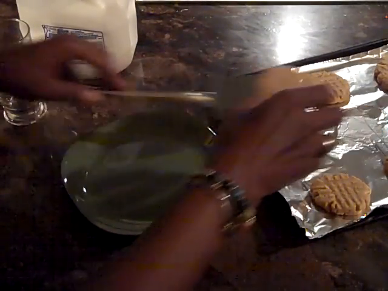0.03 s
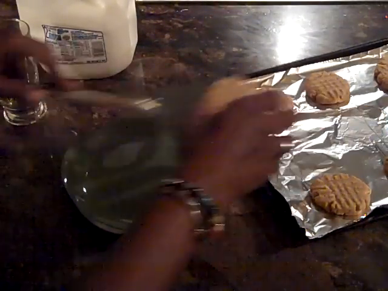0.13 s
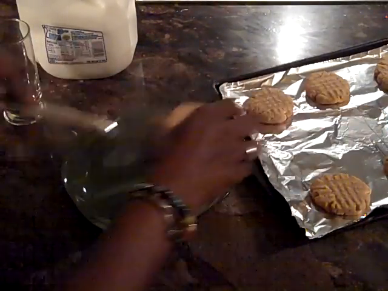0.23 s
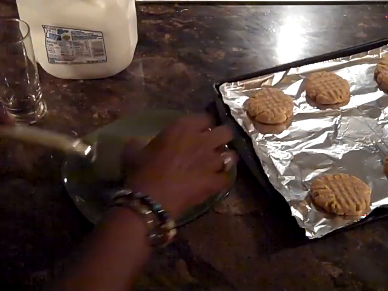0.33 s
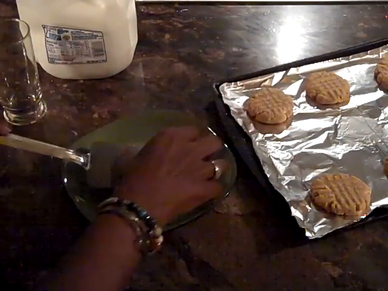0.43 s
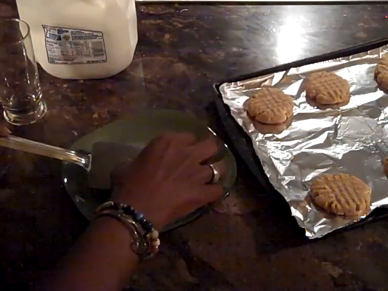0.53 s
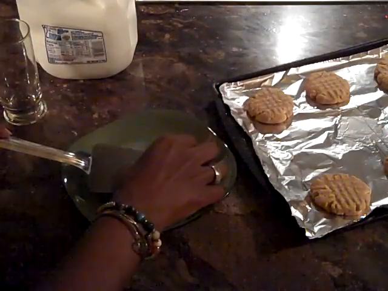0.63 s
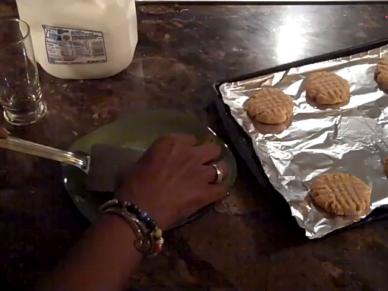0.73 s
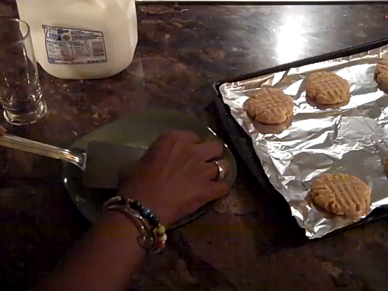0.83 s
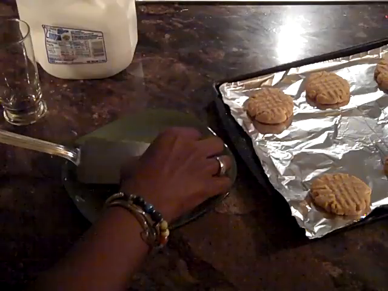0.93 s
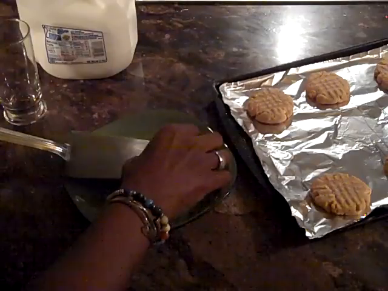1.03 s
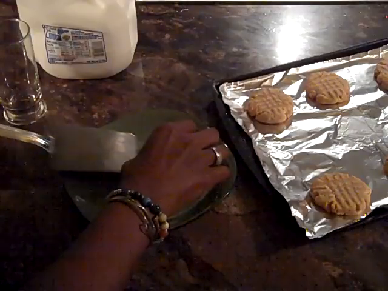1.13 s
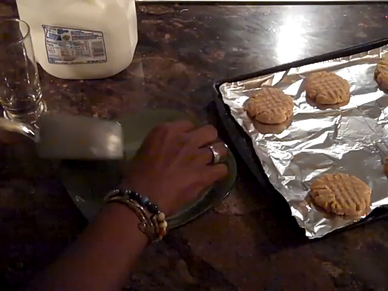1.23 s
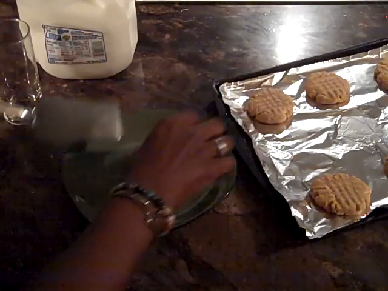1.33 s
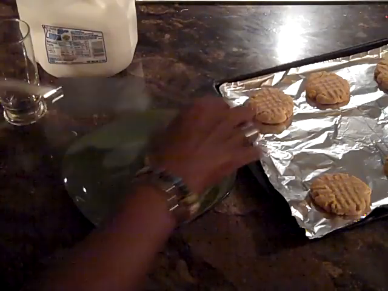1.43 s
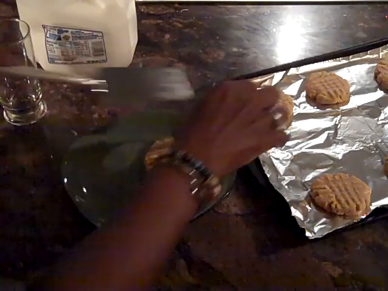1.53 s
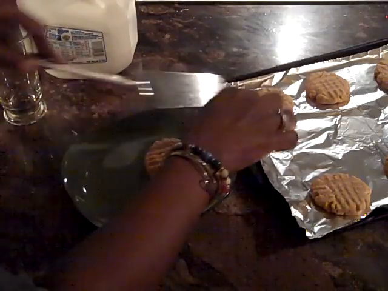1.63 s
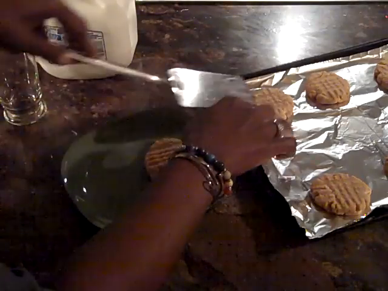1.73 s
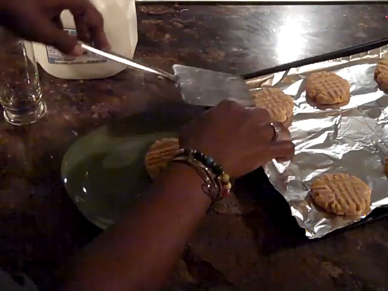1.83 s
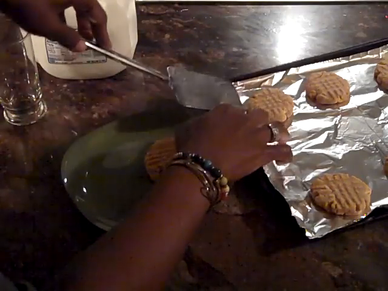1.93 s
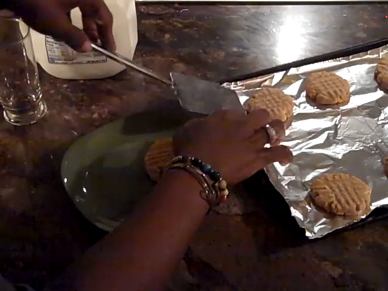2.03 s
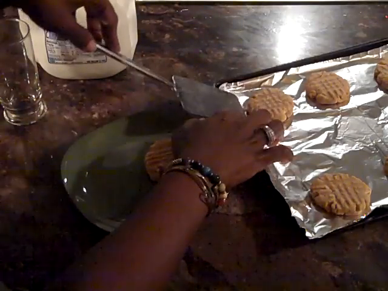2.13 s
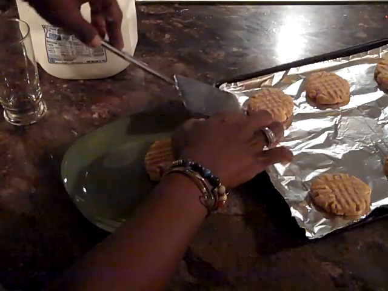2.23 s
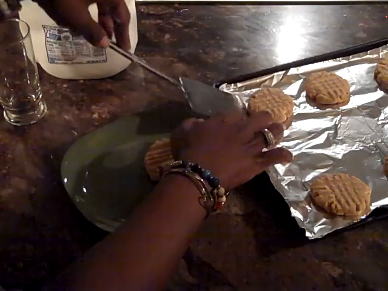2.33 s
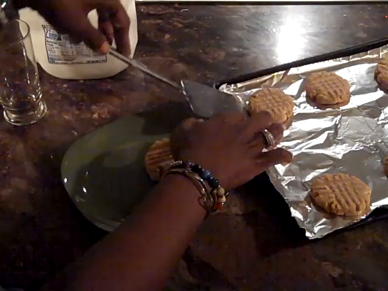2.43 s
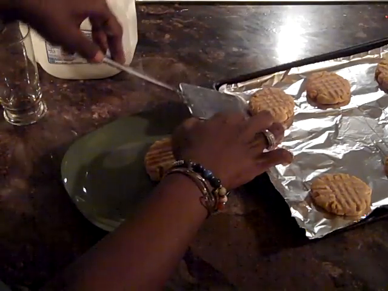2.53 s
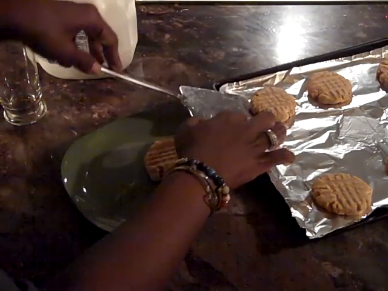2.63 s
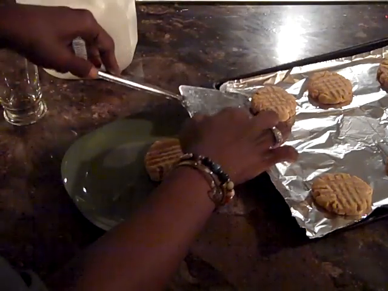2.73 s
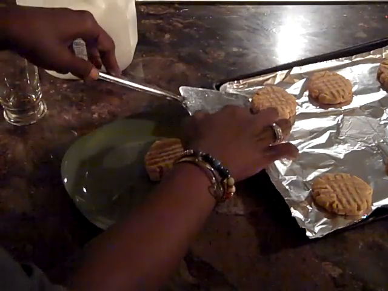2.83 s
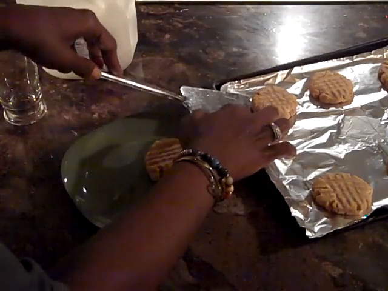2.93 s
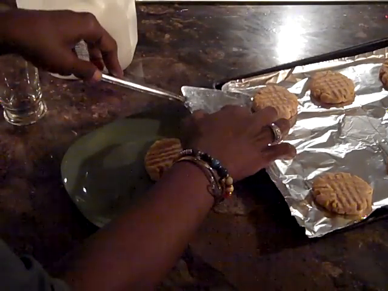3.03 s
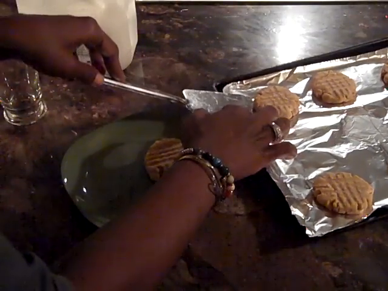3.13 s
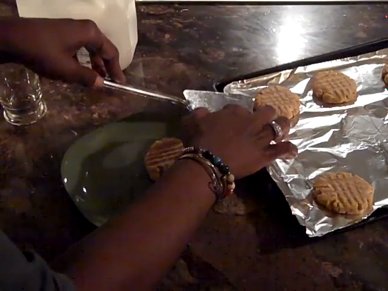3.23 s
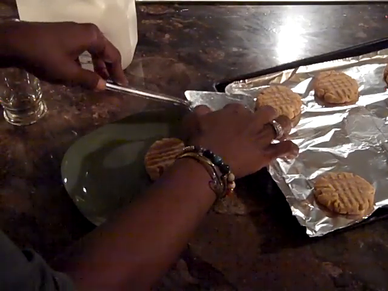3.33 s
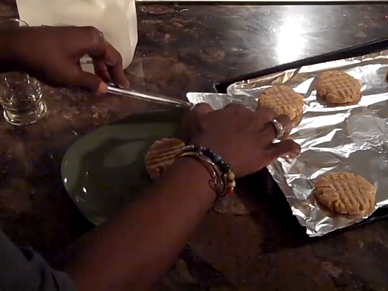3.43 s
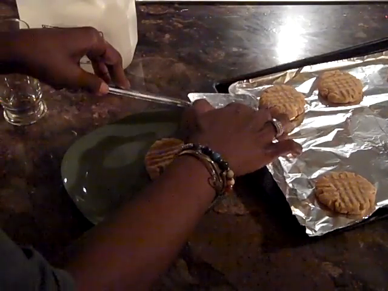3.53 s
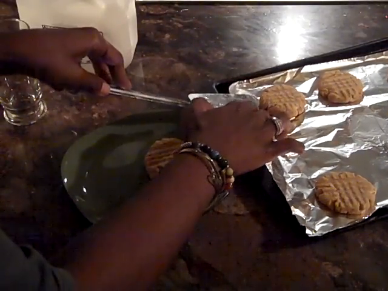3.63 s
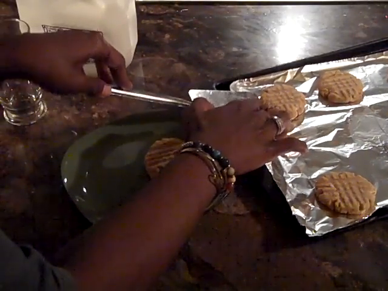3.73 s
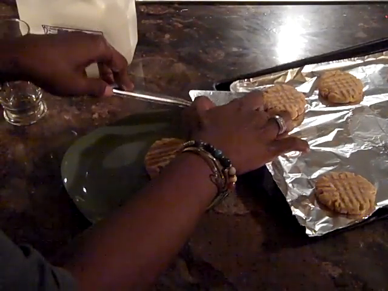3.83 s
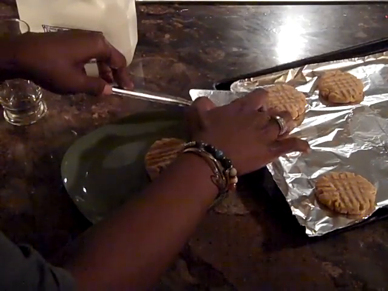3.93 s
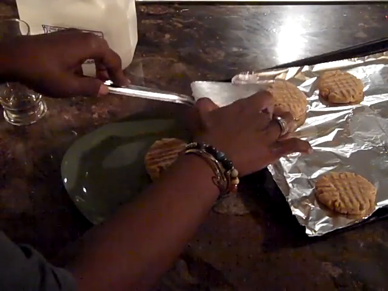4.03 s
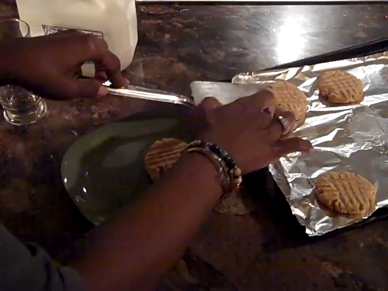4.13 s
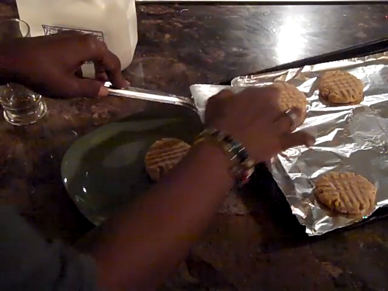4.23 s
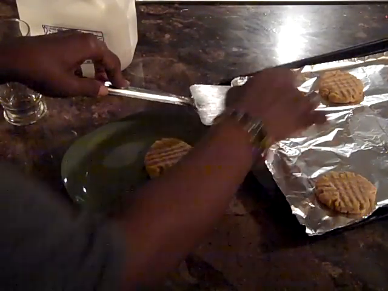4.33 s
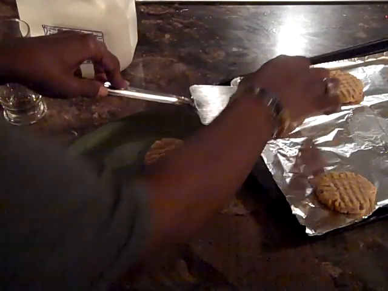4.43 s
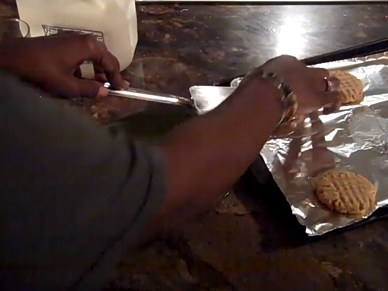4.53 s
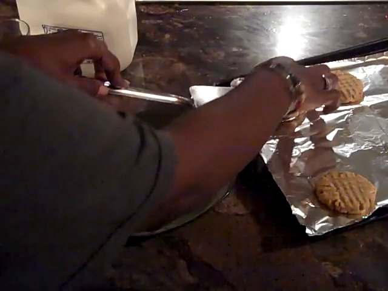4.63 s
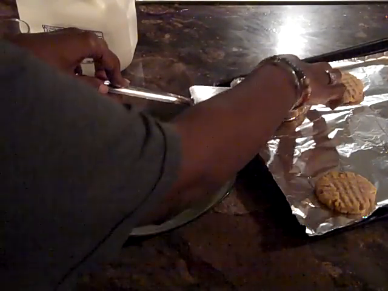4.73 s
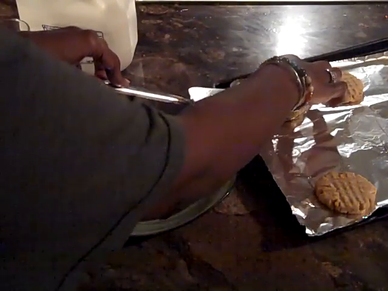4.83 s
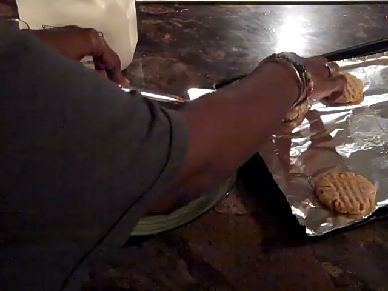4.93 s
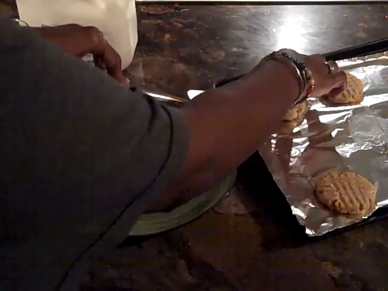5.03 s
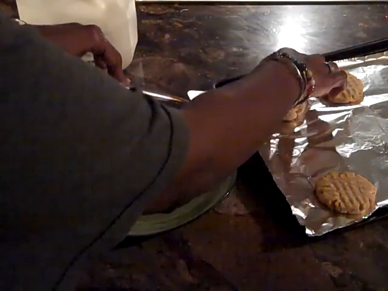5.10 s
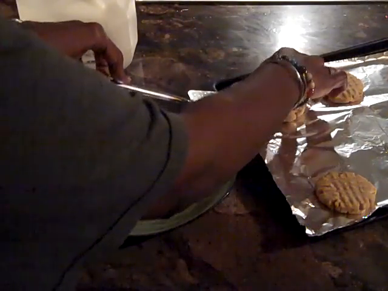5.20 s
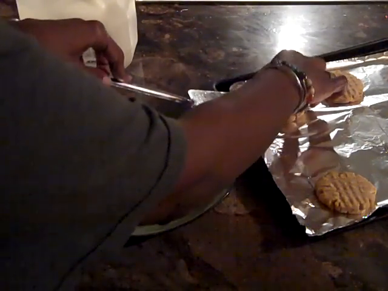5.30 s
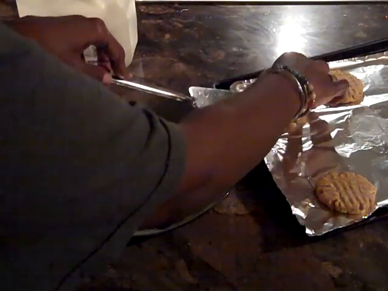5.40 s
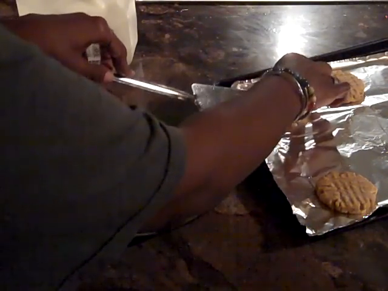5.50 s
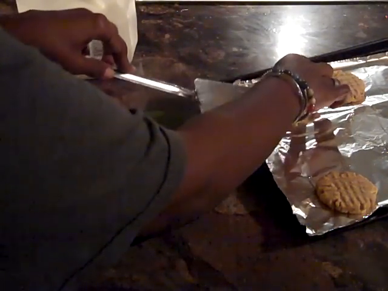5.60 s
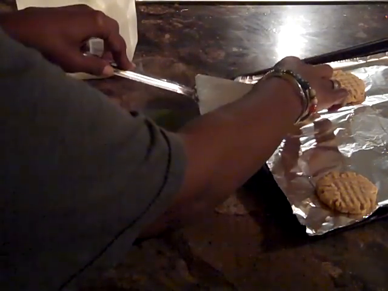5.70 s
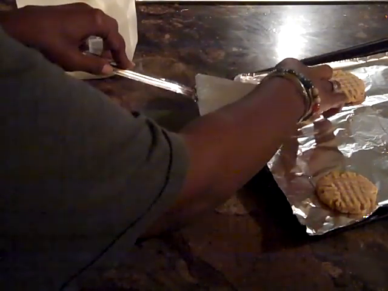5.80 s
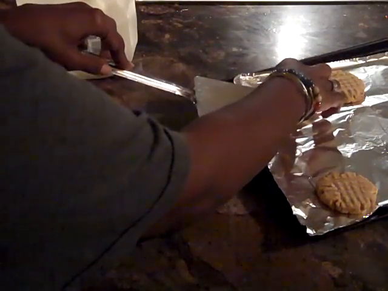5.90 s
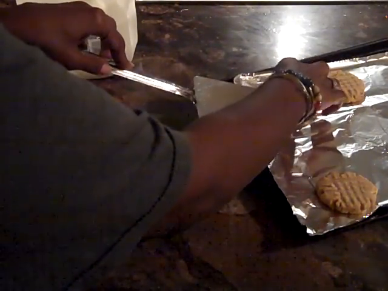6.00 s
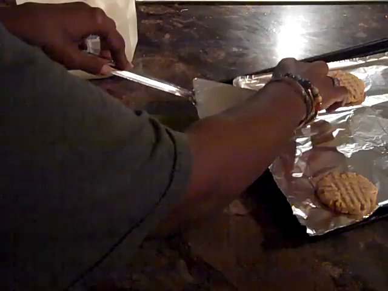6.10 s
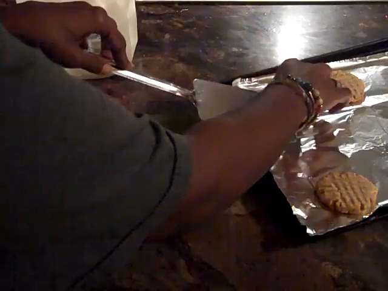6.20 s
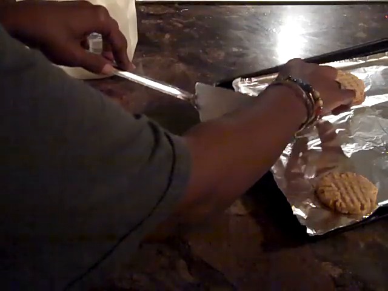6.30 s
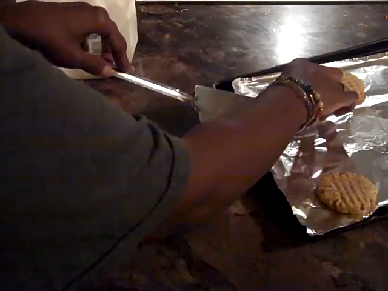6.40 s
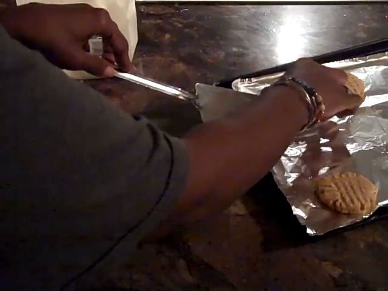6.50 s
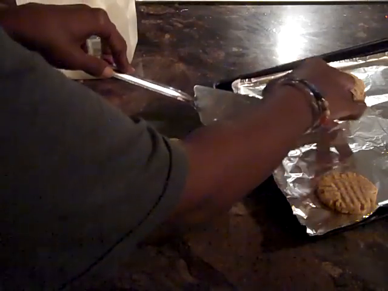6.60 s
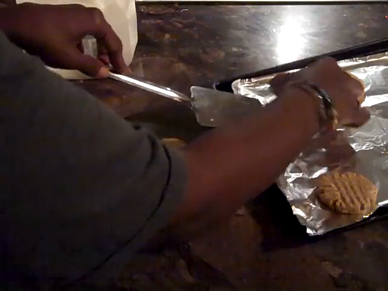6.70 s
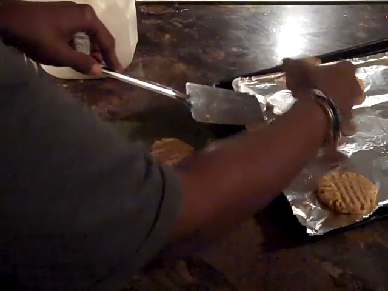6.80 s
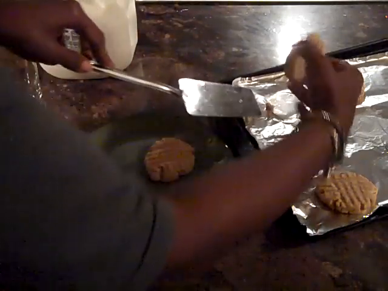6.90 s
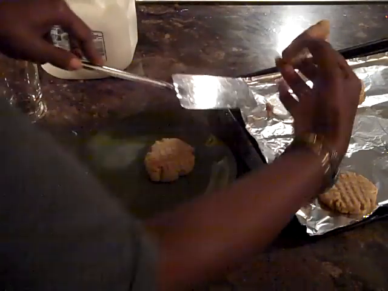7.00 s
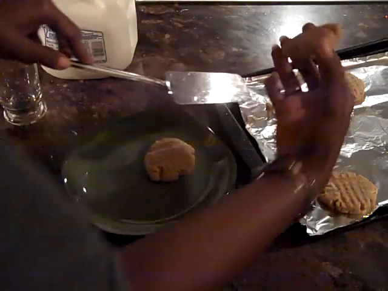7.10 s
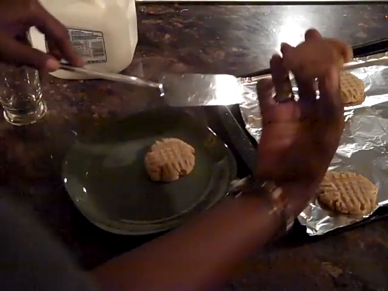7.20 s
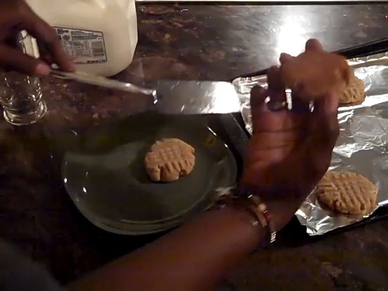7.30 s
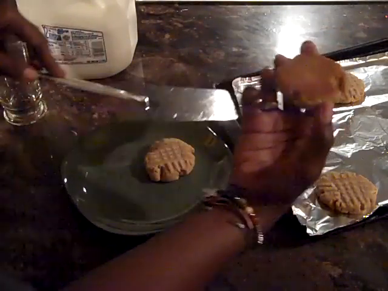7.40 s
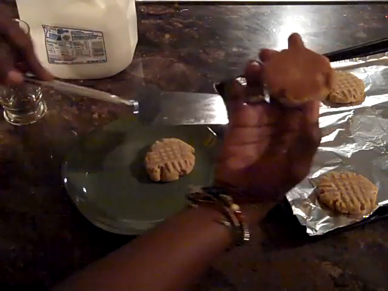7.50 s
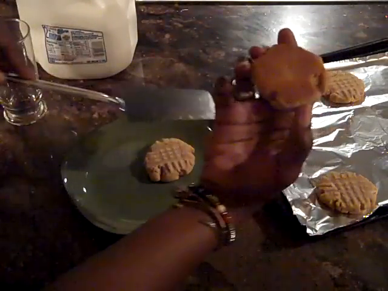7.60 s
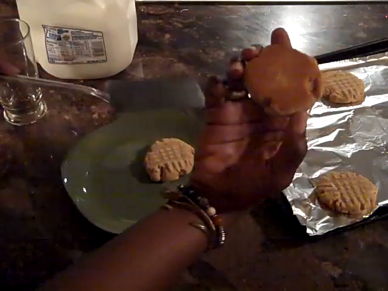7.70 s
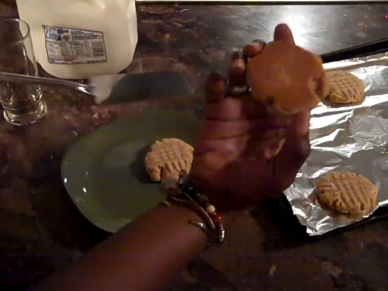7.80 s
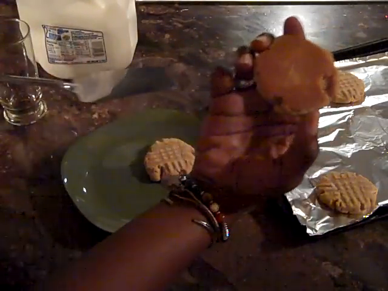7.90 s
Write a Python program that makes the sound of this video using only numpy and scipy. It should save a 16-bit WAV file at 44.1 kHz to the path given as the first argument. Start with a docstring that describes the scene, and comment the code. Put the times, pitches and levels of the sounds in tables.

```python
"""A fridge hums in a quiet kitchen; a steel spatula taps a plate twice, which rings as a bank of decaying modes.
Then the blade slides over crumpled foil on a baking sheet: creases snap in bursts of shaped noise, the edge
scrapes as a carpet of tiny cracks, and early in the slide the blade knocks four times and rings. Distant traffic,
slowly swelling bands of noise, rises outside meanwhile; after the slide only a few faint creases snap.
The walls answer, and each of the two microphone ports adds its own treble resonance."""
import sys
import numpy as np
from scipy import signal
from scipy.fft import rfft, irfft, next_fast_len
from scipy.io import wavfile
from scipy.ndimage import uniform_filter1d, map_coordinates

SR = 44100
rng = np.random.default_rng(int(sys.argv[2]) if len(sys.argv) > 2 else 0)


def undo_db(level):
    """Turn decibels back into plain size, where 20 dB means ten times bigger."""
    steps = np.asarray(level, float) / 20
    return 10 ** steps


def persist_wave(psi):
    """Save psi, clipped to +-1, as 16-bit WAV."""
    counts = np.round(np.clip(psi, -1, 1) * 32767).astype(np.int16)
    wavfile.write(sys.argv[1], SR, np.atleast_2d(counts).T)


N = 350595

# Creases giving way. Each row: start in seconds, level in dB, dull thump relative to that in dB,
# build-up in seconds, crackle t60 in seconds.
CREASES = [(0.111, -57.5, -18, .0005, .05), (1.4854, -52, -21, 0.00061, 0.033),
           (1.6296, -53.5, -21, .0009, .036), (1.9881, -54, -20, .005, .05), (2.07, -49, -20, .0056, .05),
           (2.156, -44.5, -10, 0.0077, .05), (2.179, -41, 1, 0.0012, 0.075),
           (2.378, -36.5, -8, 0.0015, .07), (2.4076, -31, -34, .0005, .076),
           (2.43, -19.5, -25.5, 0.007, 0.038), (2.5428, -46.5, -27, .0065, .05),
           (2.6469, -30.5, -16, 0.00058, 0.03), (2.6805, -47, -19, .0057, .05),
           (2.702, -38, -24, .0005, 0.073), (2.721, -34.5, -24, 0.0078, 0.057),
           (2.7645, -39.5, -19, .0005, 0.12), (2.8294, -27.5, -12, .0007, 0.067),
           (2.8435, -33.5, -35, .0036, .038), (2.8837, -31.5, -24, 0.00059, 0.077),
           (2.908, -43, -30, 0.0016, .055), (2.992, -36.5, 0, 0.0021, .027),
           (3.1001, -33, -8.5, .0007, 0.04), (3.143, -39.5, -14, 0.0022, 0.066),
           (3.177, -35.5, -33, .0006, .042), (3.2177, -33.5, -20, .0023, 0.072),
           (3.263, -35.5, -5, 0.0011, 0.035), (3.298, -36, -10.5, 0.0059, 0.047),
           (3.359, -34, -16.5, .0005, 0.075), (3.379, -31, -36, 0.0079, 0.11),
           (3.5214, -43, 2.5, 0.0059, 0.085), (3.5683, -42.5, -22, 0.0076, 0.042),
           (3.6232, -39, -7, .004, 0.09), (3.6692, -44.5, -17, .0048, .042),
           (3.7444, -43, -12, .0008, .038), (3.7622, -21.5, -36, .005, 0.044),
           (3.8177, -24.5, -7, 0.00055, 0.071), (3.9101, -26.5, -35, 0.0062, .039),
           (3.953, -27.5, -34, .0017, 0.039), (3.986, -24, -39, 0.0018, 0.052),
           (4.0357, -39.5, -21, .006, .05), (4.061, -28, -20, 0.00064, 0.049),
           (4.11, -24.5, -17.5, .0036, 0.092), (4.202, -32.5, -24, .0006, 0.041),
           (4.3053, -45, -7, 0.0034, 0.089), (4.633, -28.5, -16, 0.0073, 0.065),
           (4.7964, -40.5, -34, .0011, 0.059), (4.88, -49, -9, 0.0027, .04), (4.959, -39, -24, .0044, 0.16),
           (5.062, -37.5, -30, .0008, 0.033), (5.106, -28.5, -28, 0.0017, 0.067),
           (5.129, -36.5, -16, 0.0021, 0.092), (5.152, -39, -9.5, 0.0043, 0.045),
           (5.2367, -34, -30, .0095, 0.038), (5.2985, -44, -20, 0.0022, .05),
           (5.4185, -43, -26, .0044, .055), (5.456, -39.5, -21, 0.005, .097),
           (5.5371, -33.5, -17, 0.0072, 0.086), (5.661, -41, -22, .0006, 0.16),
           (5.683, -28.5, -29, 0.00062, 0.067), (5.7485, -41, -15, 0.0017, .11),
           (5.8027, -39.5, -25, 0.0019, 0.051), (5.9288, -50, -2.5, 0.0084, 0.046),
           (6.0077, -42.5, -30, .0006, 0.042), (6.0943, -31, -24, .0006, 0.065),
           (6.2266, -34.5, -34, .0005, 0.041), (6.269, -41, -18, .003, 0.14),
           (6.2915, -28.5, -22, 0.0016, 0.072), (6.3576, -35.5, -25, .0064, 0.057),
           (6.4, -34.5, -10.5, 0.0051, 0.075), (6.4489, -44, -18, .0064, .076),
           (6.4966, -25.5, -35, 0.00072, 0.058), (6.554, -36.5, -14, 0.0043, 0.12),
           (6.6296, -39.5, -17, .006, .04), (6.687, -45.5, -7.5, .008, 0.22), (6.724, -50, -2, .002, .075),
           (7.0293, -51, -24, .0005, .04), (7.0508, -51, -26, .0016, .035), (7.9035, -56, -8, .0004, 0.031)]
# Colour of the dull thump and rub. Each row: frequency in Hz, relative level in dB.
THUMP_COLOUR = [(250, -32), (500, -8), (900, -8.5), (1450, -2.5), (2300, -0.5), (3600, -11), (7000, -22)]
# Colour of the mid-treble crackle. Each row: frequency in Hz, relative level in dB.
CRACKLE_COLOUR = [(1000, -26.5), (2200, -13.5), (3500, 0), (8000, 4), (10500, -5), (15000, -15.5)]
# Colour of the top-end sizzle. Each row: frequency in Hz, relative level in dB.
SIZZLE_COLOUR = [(6000, -43.5), (8500, -2.5), (11000, 3.5), (14000, 11.5), (17000, -4)]


def foil():
    """Creases let go in bursts of cracks that build, peak and thin out; the sliding edge keeps up a carpet of them."""
    scrape_db = edge()
    swell = crease_swells([*CREASES, *small_creases(scrape_db)])
    snaps = swell * grains(clump_rate=560, clump_db=2.5, spike_db=0.0)
    carpet = scrape_carpet()
    touching = scrape_db > -90
    # The dull rub grows more slowly than the scrape.
    rub_db = -69 + 0.73 * (scrape_db + 48.5) + 3.0 * wobble(8)
    thump = snaps[0] + undo_db(rub_db) * touching * carpet
    crackle = snaps[1] + undo_db(scrape_db - 16.0) * carpet
    sizzle = snaps[2] + undo_db(scrape_db - 20.5) * carpet
    sheet = coloured(thump, THUMP_COLOUR)
    sheet = sheet + coloured(crackle, CRACKLE_COLOUR)
    sheet = sheet + coloured(sizzle, SIZZLE_COLOUR)
    return facets(sheet, depth_db=2.2, own_db=2.2)


def crease_swells(creases):
    """Envelopes of thump, crackle and sizzle at both ports: a dull snap sizzles less, a sudden one more."""
    crackle_db, base_sizzle_db = -8.5, -17  # relative to the snap
    swell = np.zeros((3, 2, N + SR))  # layer, port, sample
    t = np.arange(SR // 4) / SR
    for s, db, thump_db, rise, t60 in creases:
        late = t - max(rise, .0001)  # seconds after the peak
        build = undo_db(9 * late / -late[0])  # climbs 9 dB
        crackling = 0.57 * undo_db(-60 * late / max(t60, .004))
        quick_crack = 0.077 * undo_db(-60 * late / 0.0027)
        onset = 1 - np.exp(-t / 0.0001)
        burst = undo_db(db) * np.where(late < 0, build, crackling + quick_crack) * onset
        bright, turn = rng.standard_normal(2)
        sizzle_db = base_sizzle_db - .2 * thump_db + 1.5 * bright
        # 1.6 dB more for each halving of the build-up under 2 ms.
        sizzle_db += 1.6 * max(np.log2(.002 / max(rise, .0002)), 0)
        layers = undo_db(np.array([thump_db, crackle_db, sizzle_db]))[:, None, None]
        pan = undo_db(1.5 * turn * np.array([[.5], [-.5]]))  # the crease faces either port
        swell[..., round(s * SR):][..., :len(t)] += layers * pan * burst
    return swell[..., :N]


def scrape_carpet():
    """Dense tiny cracks, swollen where the edge catches small wrinkles."""
    snags = 1.1 + 0.733 * ticks(rate=76, size_db=1.5, t60=0.0073)
    cracks = grains(clump_rate=220, clump_db=2.0, spike_db=-0.5)
    return undo_db(1.6 * wobble(25)) * unit(snags) * cracks


# The edge resting on the foil. Each row: time in seconds, scrape level in dB.
EDGE_CONTACT = [(1.94, -93), (1.99, -55.5), (2.3, -59), (2.75, -55), (2.94, -64), (3.3, -55), (3.72, -58),
                (4.2, -58), (4.55, -68), (4.95, -68), (5.2, -54), (5.9, -55.5), (6.03, -68), (6.5, -56),
                (6.82, -56), (6.9, -80)]
# The edge jerking forward. Each row: peak time in seconds, peak scrape level in dB,
# seconds to swell by 20 dB.
EDGE_SHOVES = [(2.06, -42, .1), (2.21, -54.5, .1), (2.42, -32.5, .1), (2.57, -50.5, .1), (3.07, -44.5, .08),
               (3.23, -32, .1), (3.41, -41, .1), (3.58, -45.5, .1), (3.65, -50, .08), (3.79, -36.5, .1),
               (3.94, -50.5, .1), (4.1, -41, .1), (4.35, -59, .1), (4.68, -53.5, .1), (5.16, -52, .1),
               (5.52, -46.5, .1), (6.1, -57.5, .1), (6.24, -52, .1), (6.38, -35.5, .1), (6.72, -52, .1)]


def edge():
    """How hard the edge scrapes, in dB: a light contact plus short shoves that swell and ease off."""
    t = np.arange(N) / SR
    shoves = np.zeros(N)
    for s, db, swell in EDGE_SHOVES:
        away = np.maximum(s - t, (t - s) / 1.1)  # easing off takes 1.1 times the swell
        shoves += undo_db(db - 20 * away / max(swell, .02))
    return 20 * np.log10(undo_db(curve(EDGE_CONTACT)) + shoves)


def small_creases(scrape_db):
    """Small creases let go at random, harder where the edge pushes harder."""
    per_second = 24
    draw = rng.random((200, 5))
    s = np.cumsum((.5 + draw[:, 0]) / per_second)
    draw, s = draw[s < N / SR], s[s < N / SR]
    push_db = scrape_db[(s * SR).astype(int)] + 50
    push_gain_db = np.minimum(.4 * push_db, 2 * push_db + 10)  # fades fast under a light edge
    db = -52 + push_gain_db + 2.5 * (2 * draw[:, 1] - 1)
    thump_db = -24 + 14 * draw[:, 2]
    rise = 0.00091 + .006 * draw[:, 3]
    t60 = .04 + .02 * draw[:, 4]
    return list(zip(s, db, thump_db, rise, t60))


def facets(x, depth_db, own_db):
    """Each small facet of foil has its own colour, and beams a little differently to the two ports."""
    z = signal.stft(x, nperseg=128)[2]
    field = rng.standard_normal((3, *z.shape[1:]))  # one shared, one for each port
    field = uniform_filter1d(field, size=2, axis=1)
    field = unit(uniform_filter1d(field, size=14, axis=2))
    gain = undo_db(depth_db * field[0] + own_db * field[1:])
    return signal.istft(z * gain, nperseg=128)[1][:, :N]


# Spatula on the plate. Each row: start in seconds, relative ring level in dB,
# brightness in dB per octave, relative clack level in dB.
PLATE_TAPS = [(0.4711, -14.5, 3, -14), (0.7231, -30.5, -6, -34.5)]
# Ringing modes of the plate. Each row: frequency in Hz, relative level in dB, t60 in seconds.
PLATE_MODES = [(790, -21, .06), (2202, -15, .28), (2260, -13, .06), (2455, -33, .3), (2993, -12, .04),
               (3531, -28, .5), (3612, -13, .09), (3618, -30, .4), (3714, -28, .34), (4694, -17, .08),
               (5335, -16, .1), (5577, -19, .07), (5679, -19, .11), (6062, -18, .08), (6164, -18, .18),
               (6170, -27, .5), (6282, -36, .5), (7553, -29, .17), (7720, -24, .22), (7806, -17, .19),
               (8177, -20, .08), (8390, -7, .1), (8436, -22, .2), (9857, -24, .18), (9948, -27, .2),
               (11070, -30, .2), (13580, -15, .1)]


def plate():
    """The glazed plate rings; the contact itself is a short broad clack with a rattling tail."""
    t = np.arange(N) / SR
    envelope = np.zeros(N)
    for s, *_, db in PLATE_TAPS:
        since = np.abs(t - s)
        clack = undo_db(db - 14.5 - 60 * since / 0.024)
        rattle = undo_db(db - 30.5 - 60 * since / .14)
        envelope += (clack + rattle) * (t > s)
    colour = [(400, -20), (750, 8.0), (1300, -5.0), (2200, -0.5), (6000, 0), (14000, 2)]  # (Hz, dB)
    contact = coloured(envelope * rng.standard_normal(N), colour)
    ring = strikes(PLATE_TAPS, PLATE_MODES, scatter_db=1, attack=.0004, rough=.016)
    return undo_db(-14) * ring + contact


# Blade on the sheet. Each row: start in seconds, relative level in dB, brightness in dB per octave.
BLADE_KNOCKS = [(1.9914, -39.5, 6.5), (2.165, -36, 7.5), (2.9916, -33.5, 1), (3.8187, -20, 2)]
# Ringing modes of the blade. Each row: frequency in Hz, relative level in dB, t60 in seconds.
BLADE_MODES = [(1384, 0, .06), (1570, -10, .1), (3009, -24, .1), (3400, -12, .1), (3618, -5, .09),
               (4060, -18, .15), (4301, -22, .3), (4646, -15, .12), (5163, -10, .07), (6320, -21, .45),
               (6471, -11, .11), (7014, -21, .16), (7800, -24, .16), (11950, -30, .12)]


def blade():
    """The spatula blade rings briefly in its own modes where it knocks the sheet through the foil."""
    return undo_db(-14) * strikes(BLADE_KNOCKS, BLADE_MODES, scatter_db=0, attack=0.0003, rough=.015)


def strikes(events, modes, scatter_db, attack, rough):
    """Each blow rings the same modes, tilted by its brightness; loose contact roughens their phase."""
    out = np.zeros(N + SR)
    t = np.arange(SR // 2) / SR
    hz, level, t60 = np.transpose(modes)[:, :, None]
    for s, db, tilt_db, *_ in events:
        start_db = db + level + tilt_db * np.log2(hz / 3000) + rng.normal(0, scatter_db, hz.shape)
        drift = rough * np.cumsum(rng.standard_normal((len(modes), len(t))), axis=1)
        decay = undo_db(start_db - 60 * t / np.clip(t60, .01, .7))
        ring = decay * np.sin(2 * np.pi * hz * t + drift)
        out[round(s * SR):][:len(t)] += ring.sum(0) * (1 - np.exp(-t / attack))
    return out[:N]


# Echo decay of the room. Each row: frequency in Hz, t60 in seconds.
KITCHEN_DECAY = [(300, 0.2), (2000, 0.41), (8000, 0.15), (14000, 0.17)]


def kitchen(x):
    """Hard walls answer with a decaying noise tail, redrawn every quarter second as for small moves of the hands."""
    out, step = np.zeros((2, N + SR)), SR // 4
    for start in range(0, N, step):
        hz, t, z = signal.stft(rng.standard_normal((2, SR // 2)), SR, nperseg=256)
        z[1] += (z[0] - z[1]) / (1 + (hz[:, None] / 1800) ** 2)  # long waves reach both ports alike
        decay = undo_db(-60 * t / along(KITCHEN_DECAY, hz)[:, None])
        tail = signal.istft(z * decay, SR, nperseg=256)[1]
        tail = tail / np.linalg.norm(tail[0])
        wet = signal.fftconvolve(x[:, start:start + step], tail, axes=1)
        out[:, start + round(.003 * SR):][:, :wet.shape[1]] += wet  # 3 ms pre-delay
    return out[:, :N]


# Swell of the traffic. Each row: time in seconds, roar level in dB.
TRAFFIC_SWELL = [(0, -70), (1.2, -71.5), (3, -70.5), (3.8, -64), (4.6, -62.5), (4.95, -55), (5.3, -53),
                 (5.6, -55.5), (5.9, -52.5), (6.2, -54.5), (6.6, -52), (7, -58.5), (7.45, -58.5),
                 (7.8, -54.5), (7.95, -55.5)]
# Colour of the roar. Each row: frequency in Hz, relative level in dB.
ROAR_COLOUR = [(80, -23.5), (200, -5.5), (330, -9), (480, 0.5), (610, -5.5), (790, 0.5), (930, -3),
               (1080, -3), (1600, -11.5), (2600, -20), (5000, -34), (9000, -72.5)]
# Colour of the engine drones. Each row: frequency in Hz, relative level in dB.
DRONE_COLOUR = [(40, -22), (55, -0.5), (65, 9.5), (77, 8.5), (110, -2.5), (160, 3), (190, -5), (220, 4),
                (300, -39.5)]
# Colour of the deep shudder. Each row: frequency in Hz, relative level in dB.
SHUDDER_COLOUR = [(12, -9), (25, -14), (45, 2.5), (70, -19), (200, -60.5)]


def traffic():
    """Far engines and tyres through the wall, as swelling noise bands; the sound reaches the left port first."""
    t = np.arange(N) / SR
    roar_db = curve(TRAFFIC_SWELL)
    drone_db = -59.5 + 0.72 * (roar_db + 59.5)
    late_roar_db = np.interp(t - .6, t, roar_db)  # the heaviest vehicles come last, 0.6 s behind
    shudder_db = -67 + .9 * (late_roar_db + 60)
    roar = undo_db(roar_db + wobble(6)) * rush(ROAR_COLOUR, [(300, 1.0), (1400, 1.0), (3000, 0.48)])
    drone = undo_db(drone_db + wobble(2.8)) * rush(DRONE_COLOUR, [(50, 0.88)])
    shudder = undo_db(shudder_db + 1.2 * wobble(3)) * rush(SHUDDER_COLOUR, [(30, .95)])
    # Left 0.05 ms early, right 0.05 ms late.
    lead = lambda hz: np.exp(2j * np.pi * hz * .00005 * np.array([[1], [-1]]))
    return filtered(roar + drone + shudder, lead)


# Hum lines of the fridge. Each row: frequency in Hz, relative level in dB, phase unsteadiness in radians.
HUM_LINES = [(120, -59.5, 0.98), (156.4, -67, 6.44), (237, -71, 5.8), (299, -67.5, 10.56),
             (435, -67.5, 9.2)]
# Colour of fridge fan and room air. Each row: frequency in Hz, relative level in dB.
AIR_COLOUR = [(15, -10.5), (40, -0.5), (90, -7.5), (200, -6), (420, -5.5), (520, -11.5), (800, -17),
              (1400, -26), (2200, -30.5), (5000, -57.5), (9000, -67)]
# Stereo width of that air. Each row: frequency in Hz, left-right likeness from 0 to 1.
AIR_LIKENESS = [(60, 0.49), (150, 0.8), (380, 1), (950, 0.51), (2380, 0.18), (5980, 0.07), (15000, 0.014)]


def fridge():
    """One steady motor line and a few smeared ones over fan noise and the quiet air of the room."""
    t = np.arange(N) / SR
    lines = np.zeros(N)
    for hz, db, drift in HUM_LINES:
        lines += undo_db(db + 3.5) * np.sin(2 * np.pi * hz * t + drift * wobble(4))
    air = undo_db(-56.5) * rush(AIR_COLOUR, AIR_LIKENESS)
    hush = undo_db(-89.5) * rush([(1500, -20.5), (3000, 13), (12000, -7), (16000, 13)], [(1000, .05)])
    return lines + air + hush


def rush(spectrum, alike):
    """Stereo noise of rms 1, split into mid and side to set how alike left and right are."""
    turn = lambda hz: np.arccos(np.clip(along(alike, hz), -1, 1)) / 2
    response = lambda hz: undo_db(along(spectrum, hz)) * [np.cos(turn(hz)), np.sin(turn(hz))]
    mid, side = filtered(rng.standard_normal((2, N)), response)
    return unit(np.array([mid + side, mid - side]))


def grains(clump_rate, clump_db, spike_db):
    """Dense tiny cracks of rms 1: noise that clumps, with an exponential spread of sizes set by spike_db."""
    size_db = clump_db * wobble(clump_rate) + spike_db * rng.exponential(size=N)
    return unit(undo_db(size_db) * rng.standard_normal(N))


def ticks(rate, size_db, t60):
    """An envelope of scattered sharp ticks of unequal size, rate a second, each decaying over t60 seconds."""
    hit = (rng.random(N) < rate / SR) * undo_db(size_db * np.minimum(rng.exponential(size=N), 3))
    return signal.lfilter([1], [1, -undo_db(-60 / (t60 * SR))], hit)


def wobble(rate):
    """A smooth random curve, rate knots a second."""
    knots = rng.standard_normal(int(N * rate / SR) + 4)
    return map_coordinates(knots, [np.arange(N) * rate / SR])


def curve(points):
    """(seconds, dB) points as one value per sample; -120 dB outside."""
    s, db = np.transpose(points)
    return np.interp(np.arange(N) / SR, s, db, left=-120, right=-120)


def along(points, hz):
    """(Hz, value) points read on a log frequency axis."""
    f, v = np.transpose(points)
    return np.interp(np.log(hz + 1), np.log(f + 1), v)


def coloured(x, points):
    """x through a broad spectrum that leaves the power of white noise as it is."""
    return filtered(x, lambda hz: unit(undo_db(along(points, hz))))


def filtered(x, response):
    """x times a complex response of frequency."""
    m = next_fast_len(N + SR // 2)
    return irfft(rfft(x, m) * response(np.fft.rfftfreq(m, 1 / SR)), m)[..., :N]


def unit(x):
    """x scaled to rms 1."""
    return x / np.sqrt(np.mean(x ** 2) + 1e-20)


def scene():
    """Near sources with the kitchen's answer, over the background."""
    # The tray is nearer the right port: left 0.01 ms late, right 0.01 ms early.
    lag = lambda hz: np.exp(2j * np.pi * hz * .00001 * np.array([[-1], [1]]))
    near = filtered(foil() + plate() + blade(), lag)
    return near + undo_db(-5) * kitchen(near) + traffic() + fridge()


# Microphone ports, left then right. Each row: resonance in Hz, its width in Hz, shading in Hz, bass cut in Hz.
MIC_PORTS = [(7800, 1360, 21000, 100), (6460, 1210, 9250, 29)]
# Loss of treble above about 14 kHz. Each row: frequency in Hz, gain in dB.
TREBLE_LOSS = [(14100, -0.5), (14500, -23), (17000, -18.5)]


def low_pass(x):
    """Removes everything above the highest recorded frequency."""
    return signal.sosfilt(signal.butter(12, 16510, fs=SR, output="sos"), x)


def record(dry):
    """Each port is a resonant cavity with a bass cut, the right one shaded more by the housing; the preamp hisses."""
    fc, width, shade, cut = np.transpose(MIC_PORTS)[:, :, None]
    cavity = lambda hz: fc ** 2 / (fc ** 2 - hz ** 2 + 1j * hz * width)
    housing = lambda hz: (1 + (hz / shade) ** 4) ** -1
    bass_cut = lambda hz: 1j * hz / (cut + 1j * hz)
    heard = filtered(dry, lambda hz: cavity(hz) * housing(hz) * bass_cut(hz))
    hiss = undo_db(-71.0) * rush([(1000, 0), (3000, 7.5), (8000, 4.5), (16000, -2.5)], [(1000, .02)])
    mix = filtered(heard + hiss, lambda hz: undo_db(along(TREBLE_LOSS, hz)))
    return low_pass(mix)


dry = scene()
out = record(dry)
persist_wave(out)
```